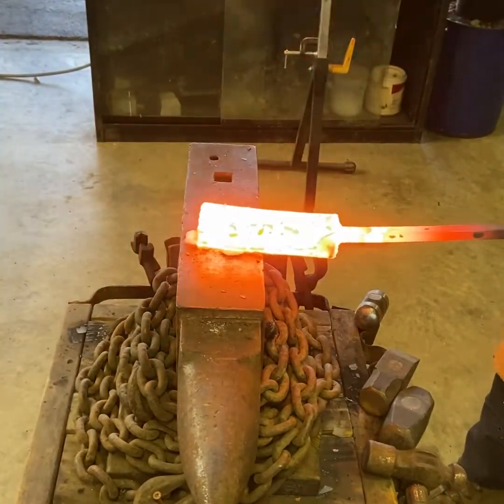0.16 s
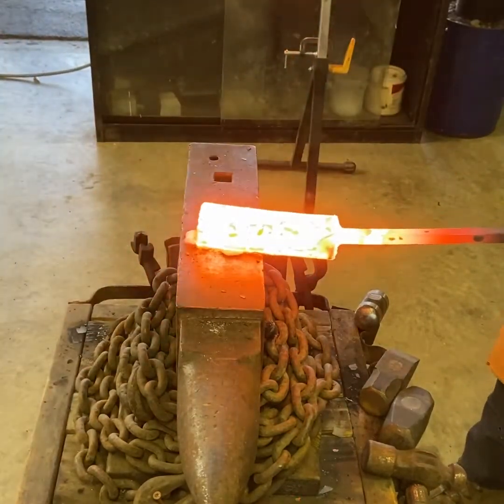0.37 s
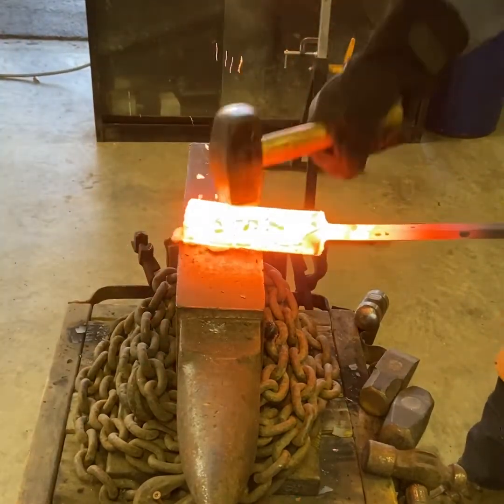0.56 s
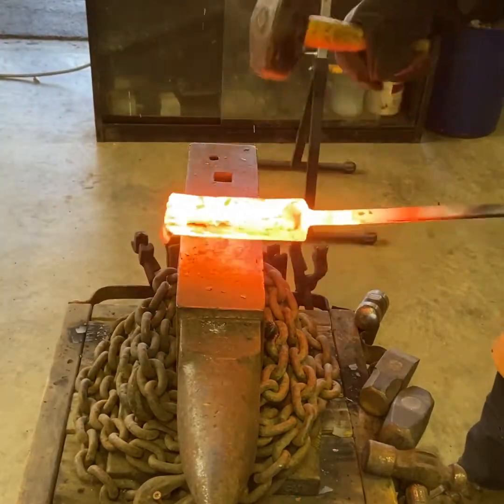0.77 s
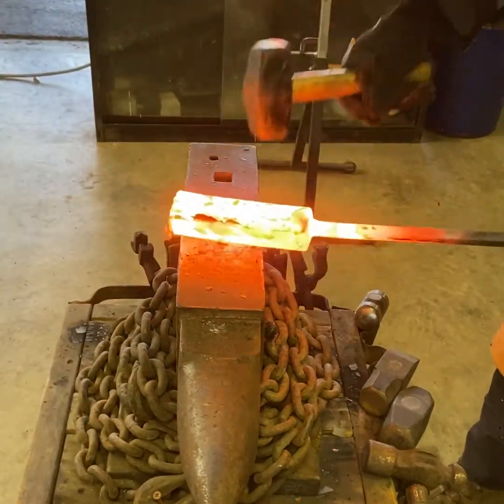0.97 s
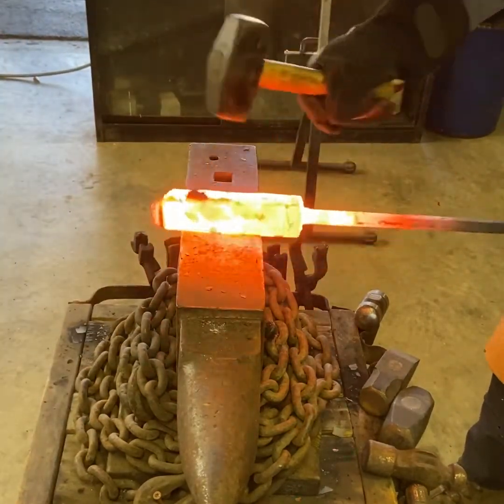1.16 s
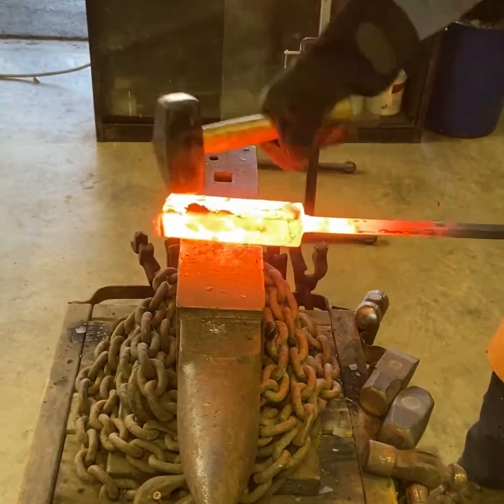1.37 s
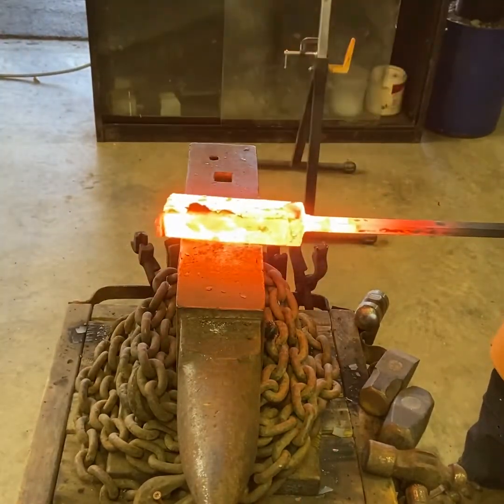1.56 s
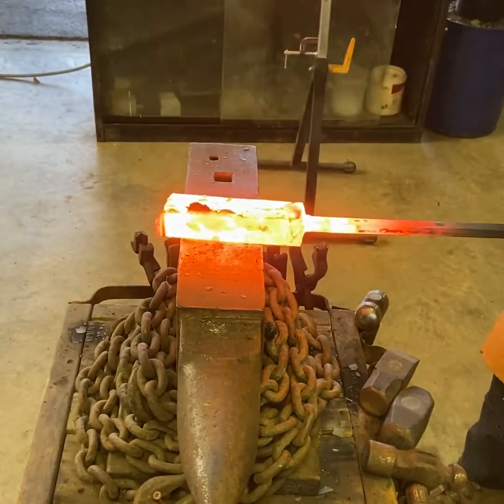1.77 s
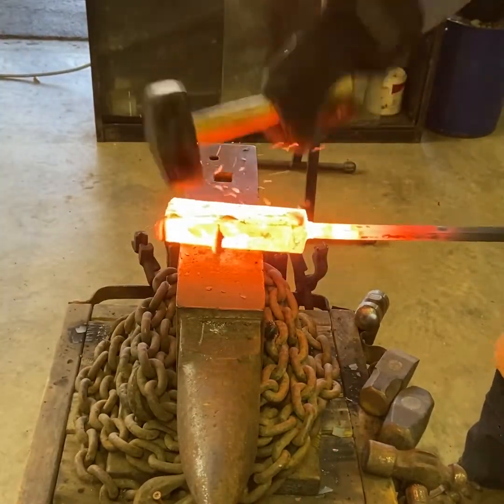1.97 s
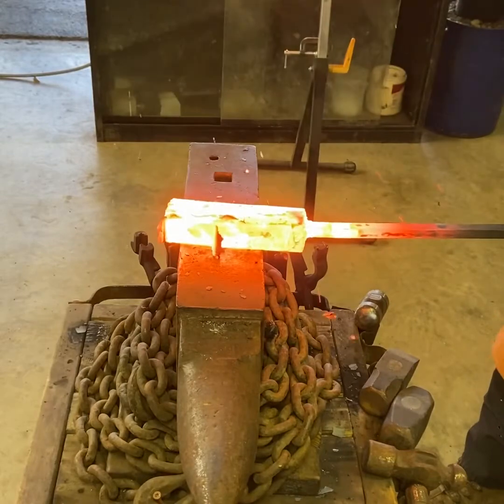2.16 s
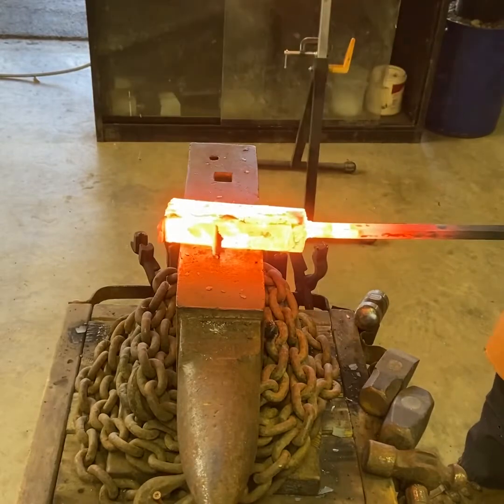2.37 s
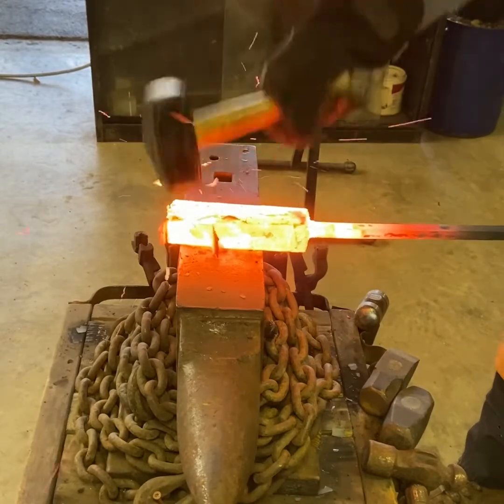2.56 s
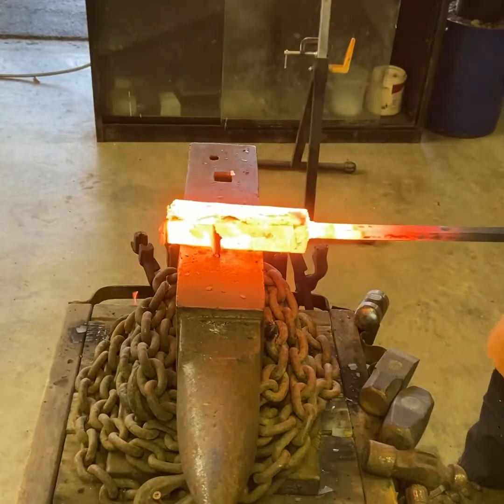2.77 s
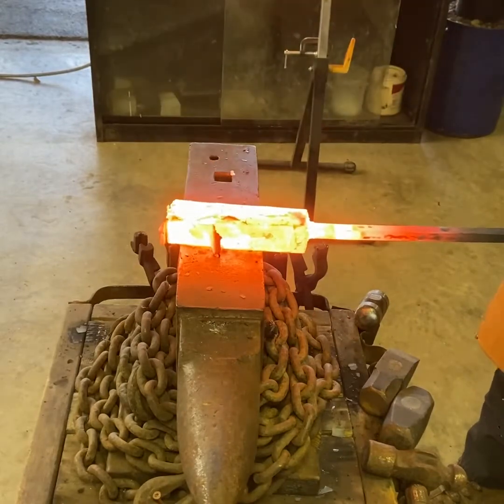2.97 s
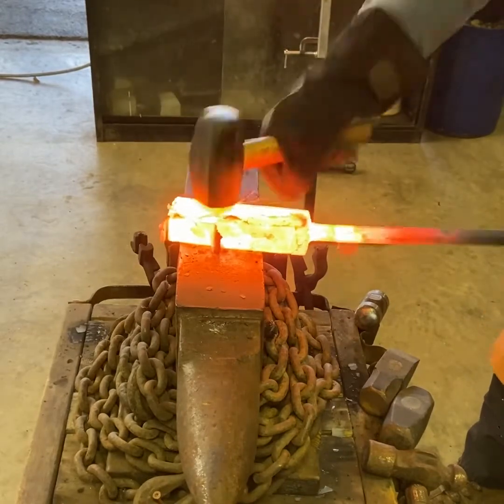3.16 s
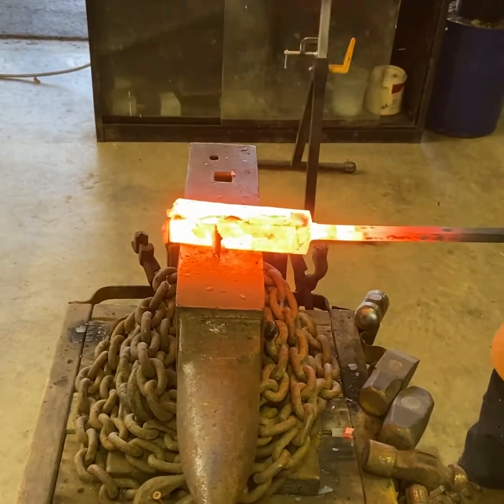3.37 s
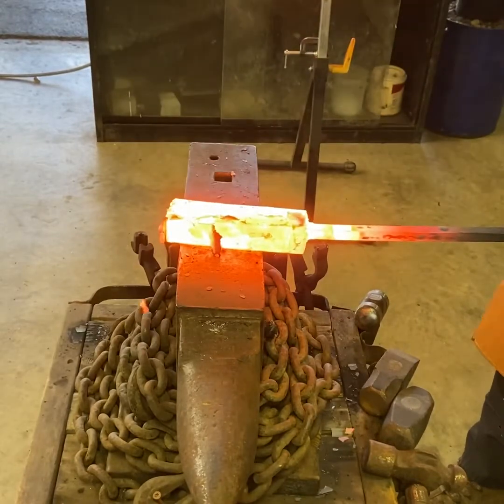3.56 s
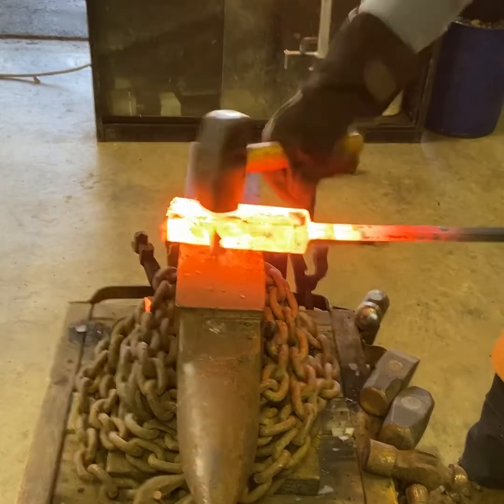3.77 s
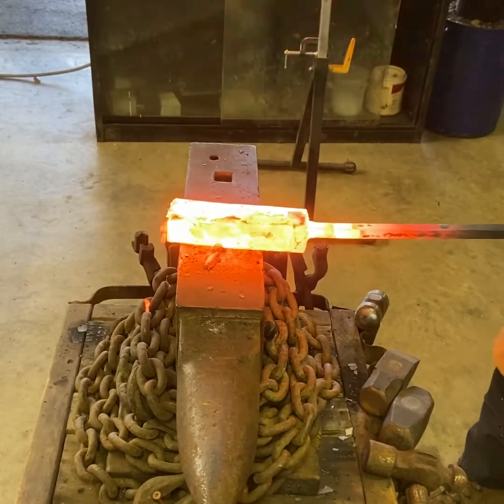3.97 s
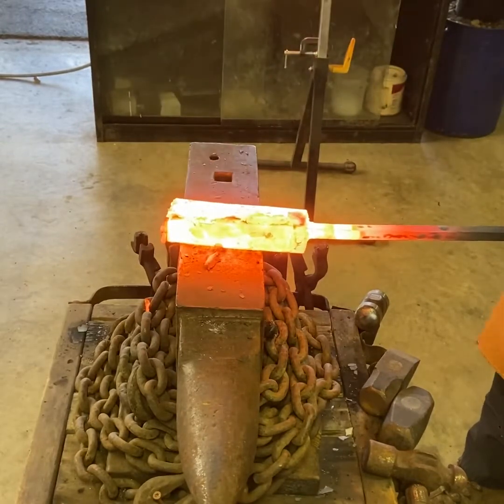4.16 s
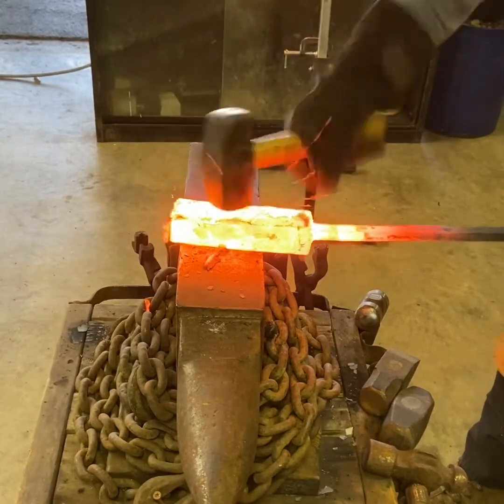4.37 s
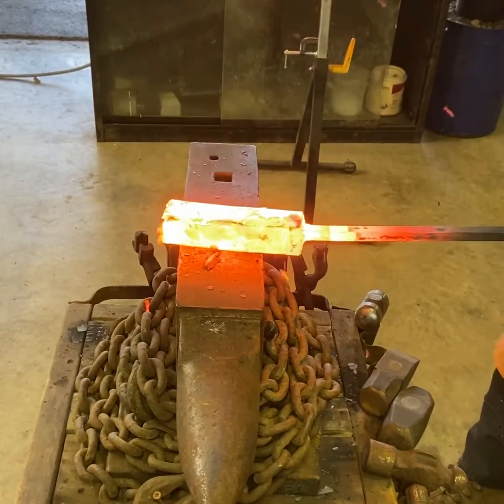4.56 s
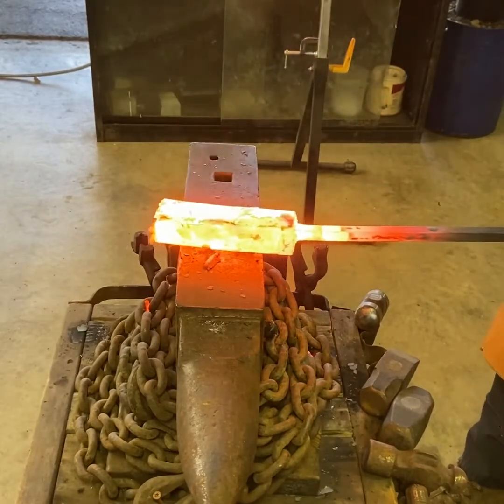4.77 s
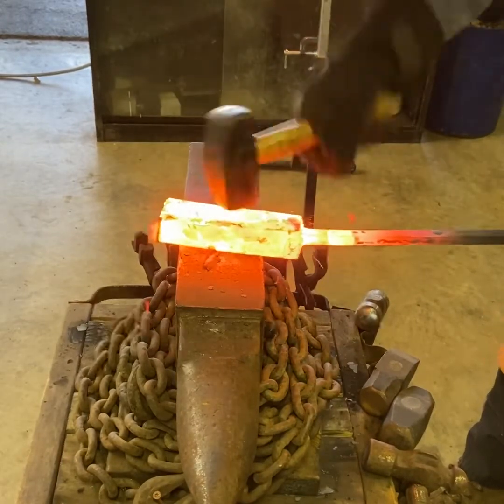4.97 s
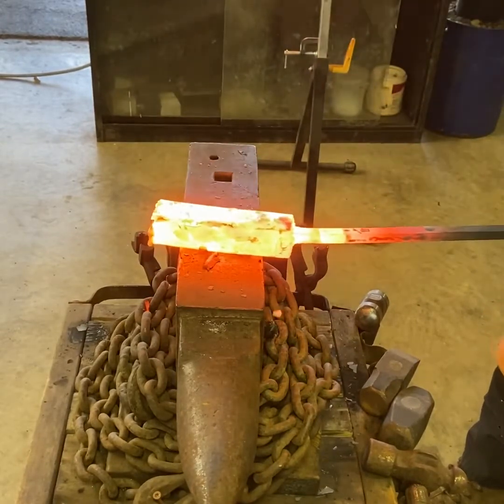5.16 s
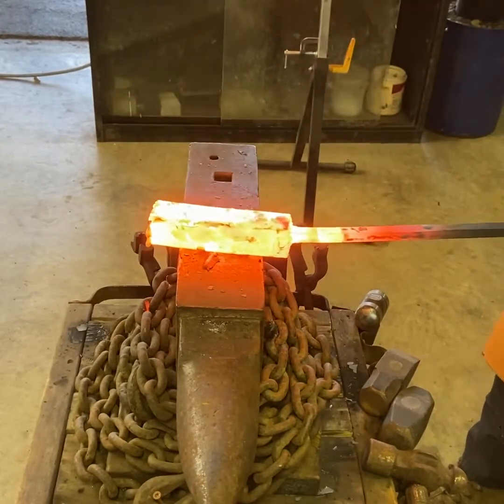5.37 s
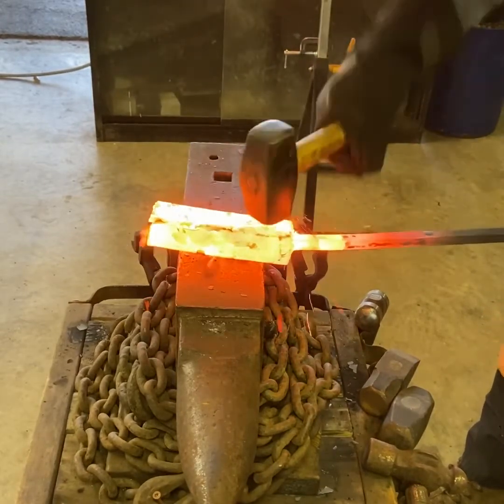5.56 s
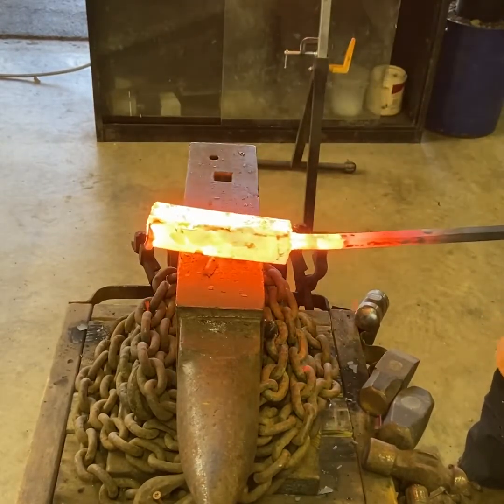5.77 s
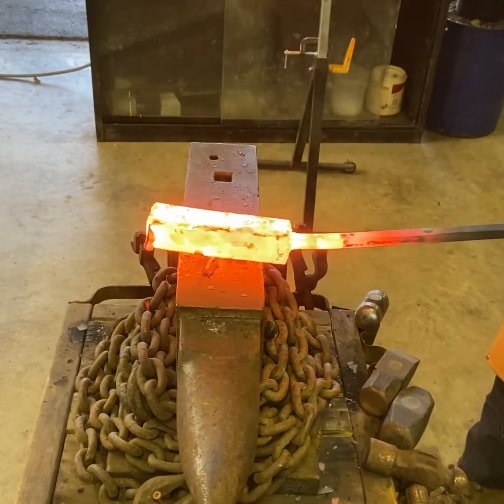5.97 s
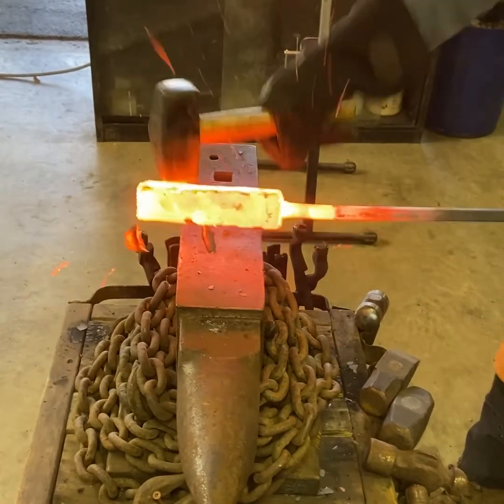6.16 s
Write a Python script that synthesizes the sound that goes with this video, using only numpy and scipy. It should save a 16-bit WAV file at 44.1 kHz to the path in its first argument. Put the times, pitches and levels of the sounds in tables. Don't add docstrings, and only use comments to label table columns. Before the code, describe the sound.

A low, breathy gas forge roar runs throughout, with faint high whistles, gradually getting quieter. At 0 s the ring and rattle of an earlier hammer blow die away, with tiny clinks following. At 0.46 s a hard blow cracks and thuds, the anvil ringing clearly until the bouncing bar mutes it, chain rattling; the background ducks. After a gap with small clinks near 1.1-1.3 s, a dull blow lands at 1.88, a light one with a singing hammer at 2.46, and the hardest, crunchy hit at 3.15. At 3.74 the anvil rings again; a firm blow follows at 4.32. Hits at 4.90 and 5.49 are dull, almost ringless, surrounded by scattered faint clinks from 4.7 to 5.75. The lightest blow comes at 6.09, cut short by the ending. Hard workshop walls add short bright reverberation; close stereo microphones saturate slightly on peaks.

```python
import sys
import numpy as np
from scipy import signal
from scipy.fft import rfft, irfft
from scipy.io import wavfile
from scipy.ndimage import uniform_filter1d

SR = 44100
rng = np.random.default_rng(int(sys.argv[2]) if len(sys.argv) > 2 else 0)


def store_wav(level_fs):
    pcm = np.round(np.clip(np.atleast_2d(level_fs), -1, 1) * 32767)
    wavfile.write(sys.argv[1], SR, pcm.T.astype(np.int16))


def level_to_linear(level):
    exponent = np.asarray(level, float) / 20
    return 10 ** exponent


N = 273861
LEAD_IN = SR // 4
APPROACH_S = 0.03

# start_s, force_db, anvil_ring_db, hammer_ring_db, gain_dip_db
BLOWS = [
    (0.4618, -8, -2.5, -55, 12),
    (1.879, -10.5, -15, -47.5, 2.5),
    (2.4591, -16.5, -13, -30, 6),
    (3.1473, -7.5, -13, -44.5, 2.5),
    (3.7403, -11.5, -3.5, -33.5, 12.5),
    (4.3181, -9.5, -10.5, -35, 6.5),
    (4.8991, -12, -38, -44, 0.2),
    (5.4893, -12, -20.5, -48, 0),
    (6.0925, -20.5, -24.5, -51.5, 7),
]
# force_db, anvil_ring_db, hammer_ring_db, gain_dip_db
EARLIER_BLOW = (7, -13.5, -45, 5.5)
ALL_BLOWS = [(-0.085, *EARLIER_BLOW)] + BLOWS


def hammer_blows(size):
    usual_force_db, usual_hammer_db = -12, -44
    loss_db, loss_per_dip_db, loss_per_glance_db = 25, -0.7, -0.4
    knocks, rings = np.zeros((2, 2, size))
    for start_s, force_db, anvil_db, hammer_db, dip_db in ALL_BLOWS:
        glance_db = hammer_db - usual_hammer_db
        mute_db = loss_db + loss_per_dip_db * dip_db + loss_per_glance_db * glance_db
        add(knocks, start_s - APPROACH_S, knock(force_db - usual_force_db, glance_db))
        add(rings, start_s, ring(anvil_db, hammer_db, mute_db))
    return knocks, rings


# freq_hz, level_db
TICK = [(800, -50), (2000, -3.5), (3500, -3), (5300, -4), (6800, -9), (9000, -7), (14000, -54)]
# freq_hz, level_db
SNAP = [(5000, -13), (7800, -10), (9500, -18), (11500, -12.5), (13500, -13)]
# freq_hz, level_db
SIZZLE = [(11000, -30), (13500, -8), (15200, 1), (16300, -8), (16800, -40)]
# freq_hz, level_db
CRUNCH = [(1500, -17), (2600, 7), (3400, -8), (4500, -2), (5600, -34), (9000, -28)]
# pitch_hz, level_db, t60_s, delay_s
THUD = [(1940, -14, 0.045, 0.000964), (1420, 5.5, 0.0058, 0.001468), (1036, -5, 0.011, 0.00301),
        (509, -0.5, 0.014, 0.00596)]
# pitch_hz, level_db, t60_s, delay_s
BAR = [(830, -0.68, 0.027, 0.003974)]
# pitch_hz, level_db, t60_s, delay_s
STAND = [(305, -14.5, 0.019, 0.00488), (210.6, -2, 0.041, 0.0062), (117.5, -9, 0.087, 0.00833)]
# pitch_hz, level_db, t60_s, delay_s
CLANK = [(1970, -16.5, 0.093, 0.004923), (1904, -13, 0.041, .005), (2065, -6.5, 0.035, 0.00186)]


def knock(extra_db, glance_db):
    t = np.arange(SR // 4) / SR - APPROACH_S
    # level_db, rise_s, spectrum
    cracks = [(-5 + 0.2 * extra_db, 0.001, TICK),
              (-7 - 0.45 * glance_db, 0.0005, SNAP),
              (-25 + 1.8 * extra_db, 0.0005, SIZZLE)]
    out = np.zeros((2, len(t)))
    for level_db, rise_s, colour in cracks:
        shared, *ports = rng.standard_normal((3, len(t)))
        out += level_to_linear(level_db) * snap(t, shared + 0.2 * np.array(ports), rise_s, colour)

    crunch_db = -45 + 0.55 * glance_db + 15
    swell = np.exp(-abs(t) / np.where(t < 0, 0.008, 0.003))
    out += level_to_linear(crunch_db) * coloured(rng.standard_normal(len(t)), CRUNCH) * swell

    # level_db, growth per dB of force, modes
    bodies = [(-4, 0.35, THUD), (-6, 0.5, BAR), (-3.5, 0.8, STAND), (-8, -0.3, CLANK)]
    for level_db, growth, modes in bodies:
        gain = level_to_linear(level_db + growth * extra_db)
        for hz, mode_db, t60_s, delay_s in modes:
            struck_hz = hz * rng.uniform(0.96, 1.01)
            struck_db = mode_db + 2.0 * rng.standard_normal()
            out += gain * mode(t - delay_s, struck_hz, struck_db, t60_s, rise_s=1 / hz)
    return out


ANVIL_HZ = [1766, 1738, 1978, 1881, 2485, 4510]
# level_db, t60_s, signed_gain
ANVIL = [(-1, 0.56, 0.87), (-20, 0.63, -0.66), (-23, 0.28, 0.75), (-15, 0.087, 1), (-39, 0.21, 0.34),
         (-20.5, .13, 1)]
HAMMER_HZ = [3390, 3910, 4840, 5068, 5278, 6002, 6869, 8005, 8667, 9141, 9402, 10190, 10895, 11190, 11960,
             12200, 15080, 15280, 15440]
# level_db, t60_s
HAMMER = [(1.8, 0.28), (-3, 0.32), (-12, .2), (7, 0.24), (-1.5, 0.32), (-7, 0.41), (-12, 0.52), (-6, 0.55),
          (5, 0.53), (-9, .12), (-6.5, 0.48), (-8, 0.44), (-18, 0.16), (-12, .12), (-24.5, .3), (-9, 0.47),
          (-21, 0.21), (-10, 0.23), (-11, 0.28)]
# time_s, level_db
SETTLE = [(0, 0), (.23, 0), (.275, -18)]


def ring(anvil_db, hammer_db, loss_db):
    t = np.arange(SR // 2) / SR
    free_s, landing_s = bounce(anvil_db)
    muted_db = -loss_db * np.clip((t - free_s) / landing_s, 0, 1) + np.interp(t, *np.transpose(SETTLE))
    anvil, hammer = np.zeros((2, len(t)))
    for hz, (level_db, t60_s, signed_gain) in zip(ANVIL_HZ, ANVIL):
        anvil += signed_gain * mode(t - 0.006, hz, level_db, t60_s, rise_s=0.0084)
    for hz, (level_db, t60_s) in zip(HAMMER_HZ, HAMMER):
        struck_db = level_db + 1.5 * rng.standard_normal()
        hammer += mode(t, hz, struck_db, t60_s, rise_s=0.007)
    grip_share = 0.6
    return level_to_linear(anvil_db + muted_db) * anvil + level_to_linear(hammer_db + grip_share * muted_db) * hammer


def bounce(anvil_db):
    usual_anvil_db = -14
    lively_db = max(anvil_db - usual_anvil_db, 0)
    return 0.06 + 0.0026 * lively_db, 0.024 + 0.004 * lively_db


# freq_hz, level_db
RATTLE = [(500, 5.5), (1200, 3), (2500, -2), (4500, -8), (7000, -11), (10000, -20), (15000, -39)]


def chain(t):
    shake = np.zeros(len(t))
    u = np.arange(SR // 2) / SR
    for start_s, _, anvil_db, _, dip_db in ALL_BLOWS:
        free_s, _ = bounce(anvil_db)
        chain_db = -28 + 0.75 * dip_db
        struck = level_to_linear(chain_db - 60 * u / 0.47) * np.minimum(u / 0.00087, 1)
        landed = level_to_linear(chain_db - 12 - 60 * u / 0.17) * np.minimum(u / 0.0034, 1)
        add(shake, start_s, struck)
        add(shake, start_s + free_s + 0.0037, landed)
    grain_db = 2.8 * evened(uniform_filter1d(rng.standard_normal(len(t)), size=150))
    return port_noise(256, lambda hz, _: level_to_linear(read(RATTLE, hz))) * shake * level_to_linear(grain_db)


CLINK_S = [.141, .372, 1.141, 1.17, 1.311, 2.26, 3.296, 4.73, 5.061, 5.153, 5.21, 5.376, 5.382, 5.458, 5.58,
           5.63, 5.751]
# ring_db, click_db
CLINKS = [(-57, -48), (-57, -58), (-56, -58), (-51, -74), (-79, -26.5), (-50.5, -53), (-64, -46),
          (-74, -55), (-52.5, -44), (-55, -54), (-61, -40), (-58, -35), (-53, -44), (-57.5, -52),
          (-50, -65), (-51, -60), (-50.5, -61)]


def clinks(size):
    out = np.zeros((2, size))
    for start_s, (ring_db, click_db) in zip(CLINK_S, CLINKS):
        add(out, start_s - APPROACH_S, clink(ring_db, click_db))
    return out


CLINK_HZ = [10070, 10008, 11670, 14660, 4700]
# level_db, t60_s
CLINK = [(3.5, 0.099), (-4, 0.22), (-2.5, 0.17), (-4, .12), (-3, .1)]
# freq_hz, level_db
CLICK = [(700, -11), (1000, 2), (2000, -5), (3000, 3), (6000, -6), (10000, -20), (16000, -10)]


def clink(ring_db, click_db):
    t = np.arange(SR // 4) / SR - APPROACH_S
    rings = np.zeros(len(t))
    for hz, (level_db, t60_s) in zip(CLINK_HZ, CLINK):
        rings += mode(t, hz, level_db + 2.0 * rng.standard_normal(), t60_s)
    click = snap(t, rng.standard_normal((2, len(t))), 0.0011, CLICK)
    return level_to_linear(ring_db) * rings + level_to_linear(click_db + 10.5) * click


# time_s, level_db
FORGE = [(0.0, -22.5), (0.9, -23.5), (2.4, -24.5), (3.9, -25.5), (4.5, -27), (6.21, -28.5)]
# freq_hz, density_db_per_hz
ROAR = [(30, -78), (55, -9.5), (110, -17.5), (140, -12), (420, -5.5), (545, -12.5), (590, -25.5),
        (1400, -29.5), (1550, -33), (3000, -41), (6000, -48), (9000, -50.5), (13000, -57), (15800, -50)]
# pitch_hz, width_hz, level_db
CHAMBER = [(156.5, 25.6, 2), (199.1, 17, -0.5), (256.3, 22, -6), (303.5, 14, -4), (354.3, 21.2, 2.5),
           (492, 3.3, -12), (651, 25, -17.5), (867.7, 19.6, -15), (1164, 73, -24), (1290, 32, -21),
           (1910, 9.7, -25)]
WHISTLE_HZ = [6100, 5496]
# width_hz, level_db
WHISTLES = [(10, -51.5), (6.7, -66.5)]


def forge(t):
    def flame(hz, frame_s):
        power = level_to_linear(2 * read(ROAR, hz))
        for peak_hz, width_hz, level_db in CHAMBER:
            power = power + level_to_linear(2 * level_db) / (1 + (2 * (hz - peak_hz) / width_hz) ** 2) ** 2
        patches = rng.standard_normal((len(hz), len(frame_s)))
        patches = uniform_filter1d(patches, size=6, axis=0)
        patches = evened(uniform_filter1d(patches, size=6, axis=1))
        return np.sqrt(power) * level_to_linear(1.67 * patches)

    out = port_noise(2048, flame) * level_to_linear(np.interp(t, *np.transpose(FORGE)))
    for hz, (width_hz, level_db) in zip(WHISTLE_HZ, WHISTLES):
        pole = np.exp(-np.pi * width_hz / SR)
        noise = rng.standard_normal(len(t)) + 1j * rng.standard_normal(len(t))
        waver = signal.lfilter([1], [1, -pole], noise)
        waver = 1.0 + waver / np.sqrt(np.mean(abs(waver) ** 2))
        out += level_to_linear(level_db) * (waver * np.exp(2j * np.pi * hz * t)).real
    return out


# delay_s, level_db
ECHOES = [(.0036, -12.5), (.0066, -15), (0.0121, -14), (0.022, -18)]
# freq_hz, t60_s
SHOP = [(150, 0.08), (600, 0.31), (1500, 0.51), (3500, 0.69), (7000, 0.25), (12000, 0.34), (13500, .08),
        (16000, 0.05)]
# freq_hz, level_db
WALLS = [(100, 0), (11500, 0), (13500, -13), (16000, -15), (16500, -40)]


def shop(x):
    taps = np.zeros((2, SR))
    at = np.arange(400, SR - 20, 20) + rng.integers(0, 20, (2, (SR - 401) // 20))
    np.put_along_axis(taps, at, rng.choice([-1., 1.], at.shape), 1)
    hz, t, z = signal.stft(taps, SR, nperseg=256)
    same = likeness(hz)[:, None]
    z[0] = same * z[1] + np.sqrt(1 - same ** 2) * z[0]
    decay = level_to_linear(-60 * t / read(SHOP, hz)[:, None])
    tail = signal.istft(z * decay, SR, nperseg=256)[1]
    tail *= level_to_linear(-11.5) / np.linalg.norm(tail[0])
    for delay_s, level_db in ECHOES:
        tail[:, round(delay_s * SR)] += level_to_linear(level_db)
    return signal.fftconvolve(x, coloured(tail, WALLS), axes=1)[:, :x.shape[1]]


# freq_hz, share
PORT_SAME = [(100, .999), (250, 1), (450, 0.91), (1200, 0.64), (1800, 0.88), (3000, 0.44), (4300, 0.41),
             (6000, 0.99), (12000, 0.96)]


def likeness(hz):
    return np.clip(read(PORT_SAME, hz), 0, 1)


def port_noise(size, magnitude):
    hop = size // 4
    frames = (N + LEAD_IN) // hop + 5
    hz = np.fft.rfftfreq(size, 1 / SR)[:, None]
    a, b, c, d = rng.standard_normal((frames, len(hz), 4)).T
    same = likeness(hz)
    right = a + 1j * b
    left = same * right + np.sqrt(1 - same ** 2) * (c + 1j * d)
    z = np.array([left, right]) * magnitude(hz, np.arange(frames) * hop / SR)
    z = z * (hz < 15850)
    noise = signal.istft(z, nperseg=size, noverlap=size - hop)[1]
    return evened(noise[:, :N + LEAD_IN])


def snap(t, noise, rise_s, colour):
    u = np.maximum(t, 0) / rise_s
    step = np.arange(len(t)) == np.argmax(u >= 1)
    puff = 0.3 * noise * u ** 2 * np.exp(2 - 2 * u)
    burst = coloured(step + puff, colour)
    return burst / abs(burst).max()


def mode(t, hz, level_db, t60_s, rise_s=0.0005):
    t = np.maximum(t, 0)
    return level_to_linear(level_db - 60 * t / t60_s) * np.sin(2 * np.pi * hz * t) * np.minimum(t / rise_s, 1)


def coloured(x, points):
    gain = level_to_linear(read(points, np.fft.rfftfreq(x.shape[-1], 1 / SR)))
    return irfft(rfft(x) * gain, x.shape[-1])


def read(points, hz):
    f, value = np.transpose(points)
    return np.interp(np.log(hz + 1), np.log(f + 1), value)


def evened(x):
    return x / np.sqrt(np.mean(x ** 2) + 1e-20)


def add(mix, start_s, sound):
    part = mix[..., LEAD_IN + round(start_s * SR):][..., :sound.shape[-1]]
    part += sound[..., :part.shape[-1]]


def scene():
    t = (np.arange(N + LEAD_IN) - LEAD_IN) / SR
    knocks, rings = hammer_blows(len(t))
    knocks += clinks(len(t))
    echoes = shop(knocks + level_to_linear(-9.5) * rings)
    return (knocks + rings + echoes + chain(t) + forge(t))[:, LEAD_IN:]


def band_limit(x):
    return signal.sosfilt(signal.butter(12, 17150, fs=SR, output="sos"), x)


# freq_hz, phase_rad
PORT_LEAD = [(0, 0), (700, -.3), (1900, 0), (2800, .55), (4300, .9), (4900, .2), (5300, .6), (6100, 2.0),
             (6750, 2.9), (7800, 3.4), (10400, 6.28), (13000, 9.1), (14100, 9.7), (16500, 12.56)]


def record(dry):
    t, hz = np.arange(N) / SR, np.fft.rfftfreq(N, 1 / SR)
    lead = np.exp(0.5j * np.interp(hz, *np.transpose(PORT_LEAD)))
    top_cut = np.clip((17000 - hz) / 800, 0, 1) ** 2
    bass_cut = 1 / np.sqrt(1 + (44 / (hz + 1)) ** 6)
    ports = irfft(rfft(dry) * [lead, 1 / lead] * top_cut * bass_cut, N)
    dip_db = np.zeros(N)
    for start_s, *_, depth_db in ALL_BLOWS:
        dip_db += depth_db * np.interp(t - start_s, [0, 0.03, 0.14, 0.18, 0.28],
                                       [0.0012, 0.67, 1.0, 0.65, 0.00091])
    ducked = ports / level_to_linear(dip_db)
    return band_limit(1.622 * np.tanh(ducked / 1.421))


dry = scene()
out = record(dry)
store_wav(out)
```